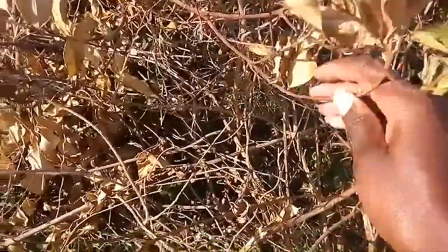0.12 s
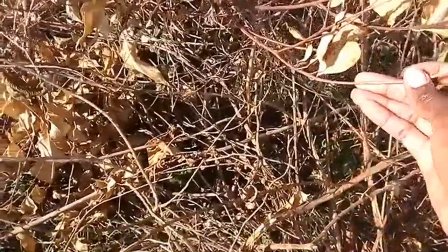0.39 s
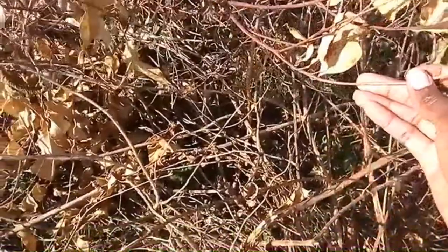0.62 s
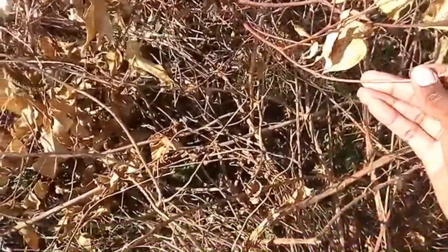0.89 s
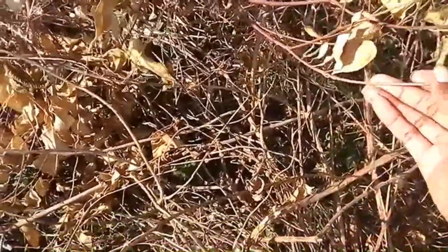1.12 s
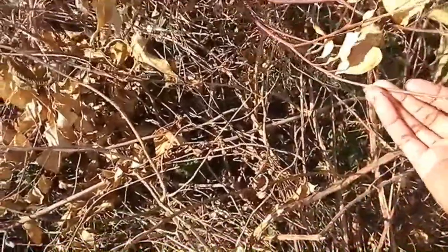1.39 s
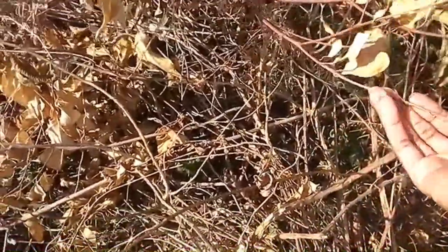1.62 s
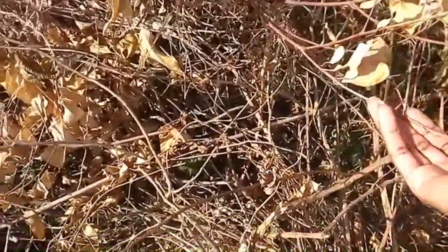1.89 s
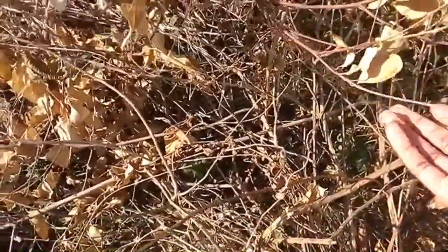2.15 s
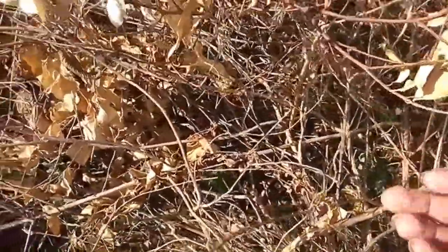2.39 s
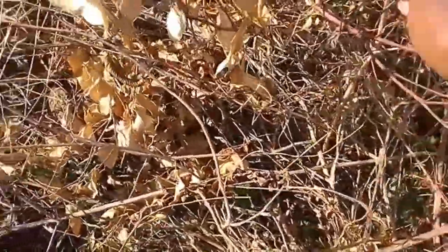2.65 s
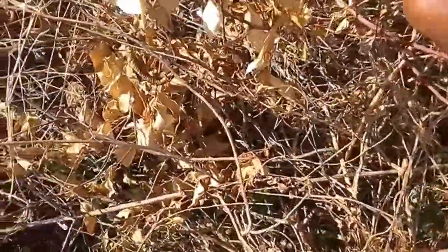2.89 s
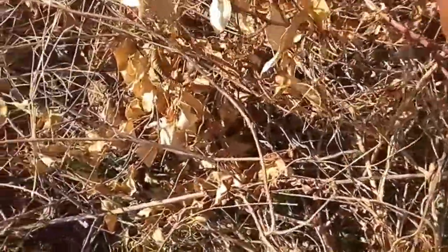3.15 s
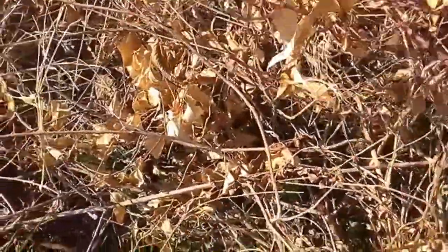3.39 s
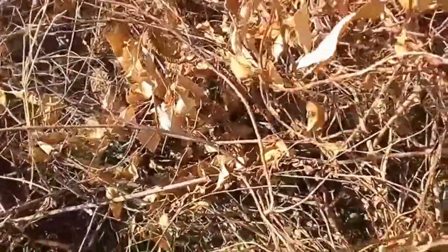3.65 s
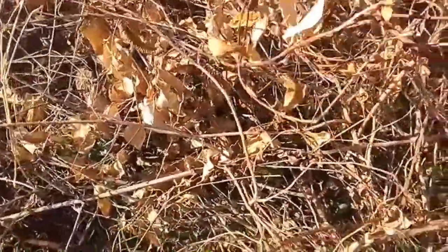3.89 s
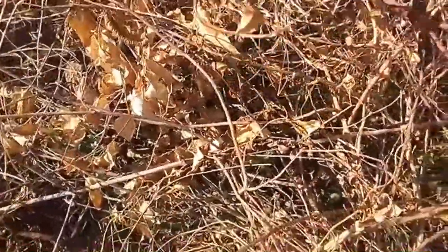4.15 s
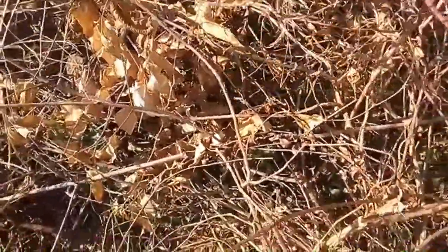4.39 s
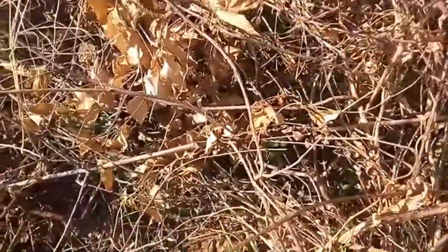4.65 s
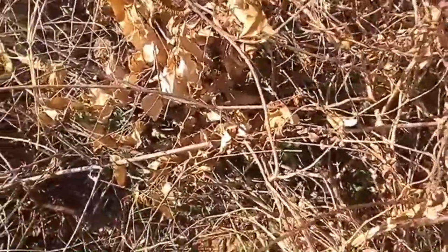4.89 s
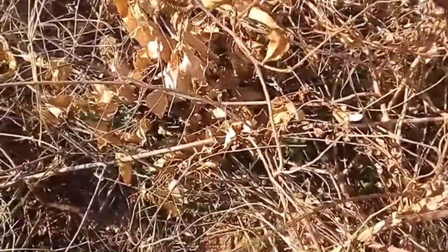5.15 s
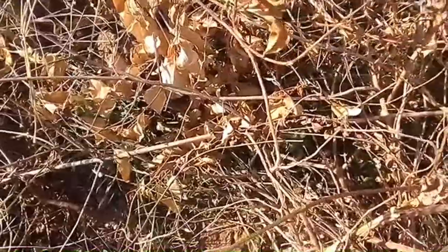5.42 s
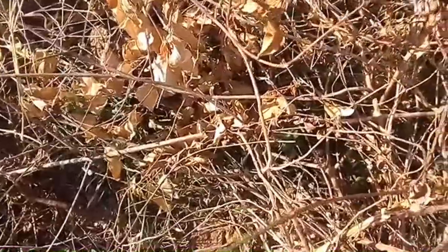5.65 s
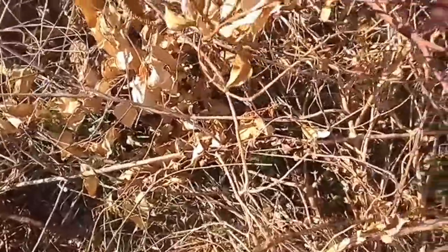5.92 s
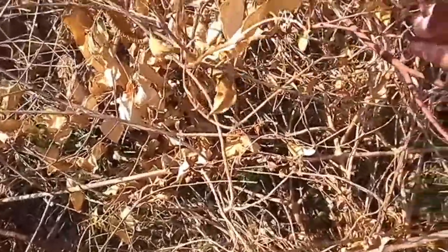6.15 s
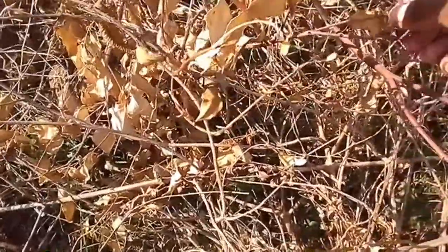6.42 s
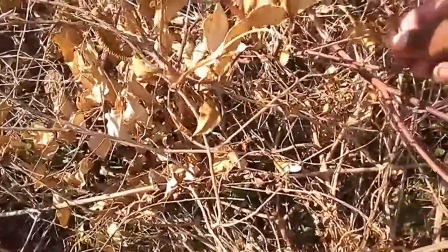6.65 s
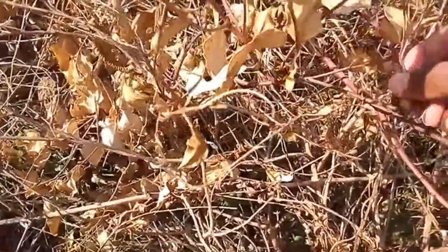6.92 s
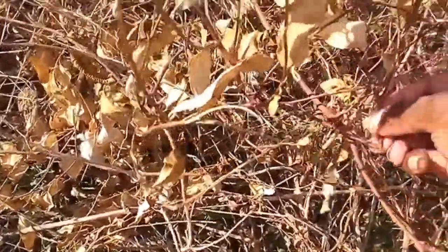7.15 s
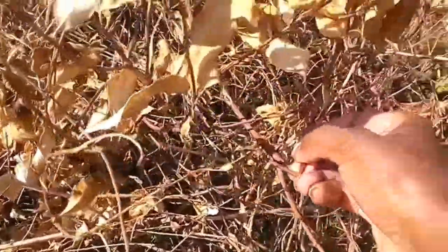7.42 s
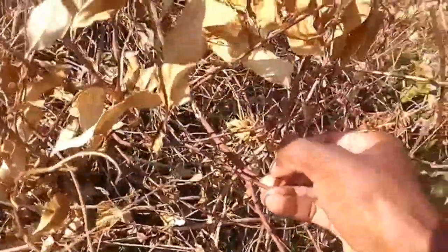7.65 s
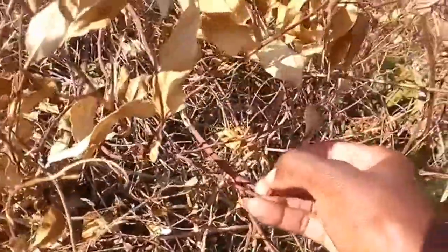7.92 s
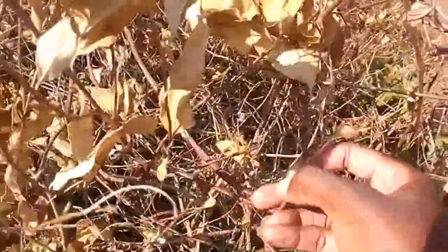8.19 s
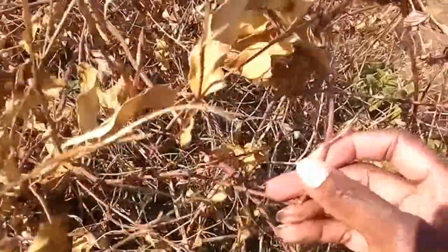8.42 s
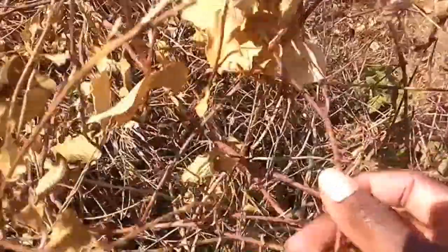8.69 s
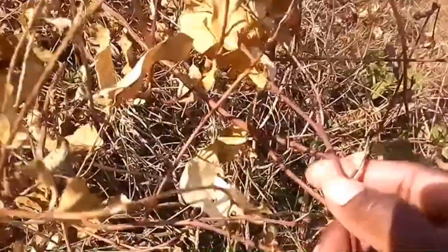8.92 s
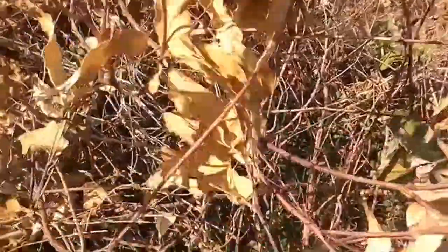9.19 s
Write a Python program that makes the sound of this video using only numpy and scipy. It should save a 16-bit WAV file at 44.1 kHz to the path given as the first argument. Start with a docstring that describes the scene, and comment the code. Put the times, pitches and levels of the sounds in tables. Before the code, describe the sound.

A hand pushes through dead brush outdoors, dry leaves rustling and brittle twigs snapping in uneven bursts, growing loudest and densest at the end.

```python
"""In dead brush, close to a small microphone, a hand pushes through dry leaves and stems.
Leaves rustle in uneven spells of filtered noise, crackle and short rings; twigs snap as noisy, jerky
cracks and leaf edges split in bright noise bursts, all coloured by a microphone port strongest near 6 kHz.
Stems knock as sagging sines and the hand-held housing gives soft low bumps. Behind it lie unsteady
air noise and one faint tone. Both channels carry the same sound."""
import sys
import numpy as np
from scipy import signal
from scipy.fft import rfft, irfft, next_fast_len
from scipy.io import wavfile
from scipy.ndimage import uniform_filter1d, map_coordinates

SR = 44100
rng = np.random.default_rng(int(sys.argv[2]) if len(sys.argv) > 2 else 0)


def int16_out(signal):
    """Quantize to a 16-bit WAV file."""
    q = np.round(np.clip(np.atleast_2d(signal).T, -1, 1) * 32767)
    wavfile.write(sys.argv[1], SR, q.astype(np.int16))


def decibels_to_gain(level_db):
    """Convert a level in decibels to a linear amplitude gain (20 dB per decade)."""
    exponent = np.asarray(level_db, float) / 20
    return 10 ** exponent


N = 410130  # length in samples

# Quiet outdoor air. Each row: frequency in Hz, relative gain in dB.
AIR_COLOUR = [(30, -24), (50, -5.5), (80, -4.5), (200, -11), (440, -12.5), (900, -16), (2200, -17),
              (3100, -18), (4200, -17.5), (5900, -6), (6800, -36.5), (8100, -33.5), (13000, -35.5),
              (15000, -26)]
# The hand resting in the brush. Each row: time in seconds, rustle level in dB, stem share in dB,
# crispness in dB.
RESTING_HAND = [(0, -64, 2.5, -11.5), (0.44, -47, 0.5, -3.5), (0.72, -66, -2.5, -42), (0.94, -70, 13, -23),
                (1.11, -62, -15, -5), (1.33, -58.5, 11.5, -11), (1.53, -58.5, -1, 1), (1.81, -48.5, 4, -7),
                (1.97, -54.5, 4, -6.5), (2.51, -62, 3, -6.5), (2.81, -72, -5.5, -2.5),
                (3.04, -77, -1, -11.5), (3.5, -42, 2, -4.5), (3.94, -49, 4.5, -1), (4.4, -42, 4, -2.5),
                (4.9, -49, 3.5, -3.5), (5.4, -75, 1, -9.5), (5.9, -80, -0.5, -8), (6.1, -54.5, 3, -8),
                (6.47, -63, 0.5, -3), (6.86, -55, 5, -1.5), (7.79, -61, 4.5, -10.5),
                (8.16, -56.5, 5.5, -8.5), (8.41, -36, 3, -1.5), (9.06, -43, 4.5, -5.5), (9.3, -25, 3, -4.5)]
# Strokes of the hand. Each row: time of full strength in seconds, rustle level in dB, swell in seconds,
# hold in seconds, release in seconds.
HAND_STROKES = [(0, -36.5, 0.086, 0.015, 0.27), (0.218, -39, 0.068, 0.11, 0.23),
                (0.623, -50.5, 0.084, 0, 0.18), (1.225, -32, 0.041, 0, 0.088),
                (1.631, -33.5, 0.042, 0, 0.053), (1.71, -26.5, 0.018, 0.021, 0.061),
                (2.099, -39.5, 0.093, 0, 0.14), (2.191, -39, 0.016, 0.15, 0.14),
                (3.082, -51.5, 0.078, 0, .2), (3.199, -37, 0.03, 0.12, 0.26), (3.398, -33, 0.23, 0.05, 0.2),
                (3.512, -31, 0.05, 0.25, 0.12), (4.035, -36.5, 0.089, 0.023, 0.043),
                (4.19, -45, 0.043, 0.034, 0.18), (4.271, -26.5, 0.06, 0.0056, 0.078),
                (4.574, -29.5, 0.075, 0, 0.11), (4.78, -38.5, 0.084, 0, 0.055),
                (5.133, -34, 0.2, 0.041, 0.28), (5.38, -42, 0.02, 0.085, 0.43),
                (5.75, -54.5, 0.026, 0.03, 0.23), (5.947, -38, 0.02, 0.036, 0.12),
                (6.214, -45, 0.062, 0, 0.12), (6.583, -43.5, 0.012, 0.06, 0.31),
                (6.756, -36.5, 0.1, 0.019, 0.099), (7.089, -37.5, 0.48, 0, 0.059),
                (7.317, -33.5, 0.061, 0, 0.05), (7.628, -43.5, 1, 0.022, 0.32),
                (7.832, -34, 0.037, 0.022, 0.13), (7.907, -26, 0.044, 0.023, 0.039),
                (8.051, -28, 0.081, 0.028, 0.074), (8.202, -32.5, 0.048, 0.057, 0.45),
                (8.528, -18, 0.019, 0, 0.02), (8.516, -26, 0.2, 0.2, 0.095),
                (8.602, -21.5, 0.014, 0.011, 0.03), (8.87, -26.5, 0.057, 0.022, 0.043),
                (9.029, -30.5, 0.18, 0, 0.017), (9.089, -25, 0.012, 0.012, 0.066),
                (9.17, -26, 0.068, 0, 0.19), (9.224, -16, 0.053, 0, 0.095)]
# Leaves as the microphone port colours them. Each row: frequency in Hz, relative gain in dB.
PORT_COLOUR = [(59, -46), (100, -24.5), (219, -21), (424, -21), (768, -16.5), (1420, -14.5), (1760, -11.5),
               (2520, -12.5), (4980, 0.5), (6290, 4), (6700, 0.5), (8280, -17), (13900, -28),
               (14700, -19.5), (16000, -15.5)]
# Twig and leaf fractures. Each row: time of the crack in seconds, nominal level in dB, pitch in Hz,
# time in seconds for the fibres to fall by 60 dB.
TWIG_SNAPS = [(0.0735, -19, 4770, 0.031), (0.2382, -9, 8000, 0.0053), (0.2413, -13.5, 6470, 0.0071),
              (0.4279, -25.5, 5430, 0.042), (0.577, -29, 6200, 0.034), (0.618, -28.5, 5970, 0.053),
              (0.6347, -25, 5850, 0.026), (0.662, -34, 6000, 0.023), (0.7763, -46, 6250, 0.087),
              (0.863, -39.5, 4600, 0.013), (1.0875, -40.5, 5890, 0.018), (1.1448, -36, 6400, 0.044),
              (1.2485, -22.5, 6060, 0.019), (1.3718, -31.5, 5400, 0.034), (1.418, -29.5, 5580, 0.028),
              (1.5692, -15.5, 5630, 0.03), (1.6845, -18, 6140, 0.095), (1.713, -12.5, 5660, 0.017),
              (1.7269, -9.5, 6600, 0.0083), (1.9915, -30, 4640, 0.01), (2.1152, -15.5, 5740, 0.016),
              (2.226, -18.5, 5930, 0.041), (2.2355, -12, 6220, 0.012), (2.262, -17.5, 5350, 0.085),
              (2.2984, -15, 6700, 0.035), (2.3222, -19, 6640, 0.029), (2.9974, -36.5, 6000, 0.019),
              (3.16, -30, 5870, 0.033), (3.187, -25, 6640, 0.035), (3.264, -22, 6560, 0.015),
              (3.2778, -13, 6680, 0.0094), (3.3118, -13.5, 6550, 0.022), (3.3523, -13, 6800, 0.02),
              (3.3596, -15.5, 6000, 0.059), (3.379, -15.5, 6370, 0.013), (3.4132, -16.5, 6200, 0.037),
              (3.492, -10, 4300, 0.036), (3.5569, -6.5, 5490, 0.035), (3.69, -17, 4240, 0.02),
              (4.048, -24, 5900, 0.025), (4.155, -23, 6030, 0.015), (4.1755, -10.5, 5600, 0.013),
              (4.184, -19, 6600, 0.043), (4.2193, -20, 6050, 0.021), (4.233, -8.5, 5990, 0.023),
              (4.2604, -17.5, 6700, 0.03), (4.5539, -16, 6500, 0.055), (4.575, -15, 4970, 0.026),
              (4.764, -26, 6200, 0.02), (5.0645, -22, 5270, 0.028), (5.3097, -23, 4940, 0.029),
              (5.4948, -24.5, 5940, 0.013), (5.743, -34.5, 5600, 0.063), (5.812, -33, 6000, 0.037),
              (5.891, -38.5, 4700, 0.02), (5.9284, -30, 5970, 0.045), (6.2045, -26.5, 5770, 0.025),
              (6.536, -40, 5500, 0.064), (6.5959, -23, 6600, 0.031), (6.639, -23, 6400, 0.015),
              (6.7499, -12.5, 4500, 0.017), (7.0833, -15, 4800, 0.031), (7.1943, -26, 4280, 0.024),
              (7.487, -23, 5750, 0.062), (7.6026, -25, 5500, 0.078), (7.7509, -25, 4930, 0.03),
              (7.852, -17, 5300, 0.028), (7.904, -8.5, 5140, 0.03), (7.9873, -10, 5800, 0.034),
              (8.0285, -15, 5340, 0.064), (8.0512, -11.5, 5520, 0.033), (8.0641, -10, 6300, 0.02),
              (8.2044, -18, 5100, 0.04), (8.237, -11.5, 6900, 0.041), (8.2823, -12, 5100, 0.035),
              (8.306, -9, 5270, 0.038), (8.3137, -9.5, 4880, 0.013), (8.3533, -16.5, 5200, 0.038),
              (8.3827, -15, 6450, 0.034), (8.5482, -4, 5860, 0.006), (8.634, -13.5, 5540, 0.033),
              (8.7172, -23, 5830, 0.037), (8.911, -16.5, 5200, 0.055), (9.015, -17.5, 5300, 0.013),
              (9.0305, -19.5, 6100, 0.012), (9.0857, -11, 5670, 0.017), (9.0944, -8, 4800, 0.014),
              (9.1546, -9, 6670, 0.03), (9.166, -6.5, 5500, 0.044), (9.1773, -5.5, 4630, 0.02),
              (9.203, -14, 6600, 0.12), (9.2597, -13.5, 5460, 0.024)]
# Bumps on the housing. Each row: start in seconds, nominal level in dB, pitch in Hz.
HOUSING_BUMPS = [(0.188, -50.5, 56.1), (0.289, -48, 54.3), (8.921, -38.5, 77.5), (9.155, -46, 122),
                 (9.21, -39.5, 45.2), (9.25, -43, 100)]
# Stems knocking together. Each row: start in seconds, nominal level in dB, pitch at the strike in Hz.
STEM_KNOCKS = [(0.23, -36.5, 520), (1.389, -43, 292), (1.908, -34, 563), (2.158, -38, 570),
               (2.304, -40.5, 254), (3.203, -24.5, 1580), (5.718, -54, 400), (6.911, -58, 261),
               (6.971, -52, 330), (7.006, -46.5, 244), (7.041, -58, 206), (7.1, -57, 260),
               (7.163, -49, 252), (7.183, -59, 210), (7.205, -51.5, 230), (7.235, -49.5, 290),
               (7.296, -47, 332), (7.344, -52, 278), (8.598, -30.5, 610), (9.057, -43.5, 237)]
# A faint far tone. The one row: start in seconds, end in seconds, centre pitch in Hz, centre level in dB.
FAR_TONE = (0.3, 1.5, 2677, -78)
# Thin leaf edges splitting. Each row: start in seconds, nominal level in dB.
EDGE_SPLITS = [(3.203, -37), (4.2936, -29), (7.082, -28), (8.715, -26), (9.204, -28)]

AIR_DB = -66
STEM_HZ, CRISP_HZ = 1880, 7460  # stems speak below the first, thin leaf edges above the second
STROKE_RANGE_DB = 20  # the level change over a swell or a release
CRISPER_PER_DB = 0.11  # leaf edges brighten as a stroke rises over the resting hand
APART_DB = -53  # at this rustle level single crackles stand most apart
SNAP_CRISPER_PER_DB = 0.13  # harder fractures reach higher
CREAK_DB, CREAK_S = -18.5, 0.0018  # the piece creaks just before it breaks
KNOCK_SAG, SAG_S = 0.19, 0.028  # the pitch of a struck stem sags by this share, with this time constant
TOP_HZ = 15700


def unit(x):
    """x at an rms of one."""
    return x / np.sqrt(np.mean(x ** 2) + 1e-20)


def curves(rows):
    """One value per sample for each column after the time."""
    s, *columns = np.transpose(rows)
    return [np.interp(np.arange(N) / SR, s, column) for column in columns]


def wobble(rate):
    """A smooth random curve, rate knots a second."""
    knots = rng.standard_normal(int(N * rate / SR) + 4)
    return map_coordinates(knots, [np.arange(N) * rate / SR])


def place(out, s, sound):
    """Adds a sound to out, starting s seconds in."""
    out[round(s * SR):][:len(sound)] += sound


def coloured(x, points):
    """x through the causal, minimum-phase filter whose gain follows the (Hz, dB) points."""
    m = 2 * next_fast_len(N // 2 + 4096)
    hz, db = np.transpose(points)
    bins_hz = np.fft.rfftfreq(m, 1 / SR)
    gain_db = np.interp(np.log(bins_hz + 1), np.log(hz), db)
    cepstrum = irfft(np.log(decibels_to_gain(gain_db) + 1e-6), m)
    # fold the cepstrum onto positive time
    cepstrum[1:m // 2] *= 2
    cepstrum[m // 2 + 1:] = 0
    return irfft(rfft(x, m) * np.exp(rfft(cepstrum)), m)[:N]


def three_bands(x):
    """x split into stem, leaf and crisp ranges that add up to x."""
    spectrum, hz = rfft(x), np.fft.rfftfreq(len(x), 1 / SR)
    low = 1 / (1 + (hz / STEM_HZ) ** 4)
    high = 1 / (1 + (CRISP_HZ / (hz + 1)) ** 6)
    return irfft(spectrum * [low, 1 - low - high, high], len(x))


def patchy(n, depth_db, size=6):
    """Noise whose narrow bands swell and fade at random; size smooths it over time frames."""
    z = signal.stft(rng.standard_normal(n), nperseg=256)[2]
    field = uniform_filter1d(rng.standard_normal(z.shape), size=2, axis=0)
    field = uniform_filter1d(field, size=size, axis=1)
    noise = signal.istft(z * decibels_to_gain(depth_db * unit(field)), nperseg=256)[1]
    return unit(noise[:n])


def air():
    """Far hiss and rumble: coloured noise, gently unsteady in level."""
    noise = coloured(patchy(N, depth_db=2.5, size=40), AIR_COLOUR)
    return decibels_to_gain(AIR_DB + 1.2 * wobble(3.8)) * unit(noise)


def push():
    """Rustle level, stem share and crispness in dB: strokes swell, hold and release over the resting hand."""
    rest_db, stem_db, crisp_db = curves(RESTING_HAND)
    t = np.arange(N) / SR
    power = decibels_to_gain(2 * rest_db)
    for s, db, swell, hold, release in HAND_STROKES:
        # zero during the hold, one a full swell before it or a full release after it
        away = np.maximum((s - t) / swell, (t - s - hold) / release)
        power = power + decibels_to_gain(2 * (db - STROKE_RANGE_DB * np.maximum(away, 0)))
    level_db = 10 * np.log10(power)
    return level_db, stem_db, crisp_db + CRISPER_PER_DB * (level_db - rest_db)


def fade(x, t60):
    """Every impulse of x dies away exponentially, by 60 dB in t60 seconds."""
    return signal.lfilter([1], [1, -decibels_to_gain(-60 / (t60 * SR))], x)


def crackle(count, spread_db, colour_db, t60):
    """Envelopes of random fractures in the three ranges; a few are larger, each has its own colour."""
    draw = rng.random((count, 2))
    at = (draw[:, 0] * N).astype(int)
    size_db = np.minimum(-spread_db * np.log(1 - draw[:, 1]), 9)
    sizes = decibels_to_gain(size_db[:, None] + colour_db * rng.standard_normal((count, 3)))
    impulses = np.array([np.bincount(at, s, N) for s in sizes.T])
    return fade(fade(impulses, t60), t60 / 5)  # each swells, then dies


def rings(count, low_hz, high_hz, cycles, spread_db):
    """Curled leaves and thin stems ring for a few cycles when flicked."""
    draw, k = rng.random((count, 3)), np.arange(1400)
    hz = low_hz * (high_hz / low_hz) ** draw[:, 1:2]
    size = decibels_to_gain(np.minimum(-spread_db * np.log(1 - draw[:, 2:]), 14))
    life = k * hz / SR / cycles
    at = (draw[:, :1] * N).astype(int) + k
    sound = size * life * np.exp(-life) * np.sin(2 * np.pi * hz * k / SR)
    return unit(np.bincount(at.ravel(), sound.ravel(), N + len(k))[:N])


def rustle(level_db, stem_db, crisp_db):
    """Leaves rub in clumps: a sliding hiss, fine crackle and short rings of leaves and stems."""
    crisp_db = np.minimum(crisp_db, 5)  # a ceiling on the leaf edges
    fine = unit(crackle(count=12000, spread_db=4.5, colour_db=5, t60=0.007))
    ticks = unit(crackle(count=4000, spread_db=8, colour_db=6, t60=0.0012))
    # little breaks at rest; hard strokes merge the crackle
    busy = 0.71 + np.exp(-((level_db - APART_DB) / 16) ** 2)
    slide = decibels_to_gain(1.8 * np.array([wobble(45), wobble(45), wobble(45)]))
    envelopes = unit(0.7 * slide + busy * (0.7 * fine + 0.31 * ticks))
    rubbing = envelopes * three_bands(patchy(N, depth_db=2.5, size=7))
    shares = decibels_to_gain(np.array([stem_db, 0 * stem_db, crisp_db]))
    leaves = 0.22 * rings(count=5000, low_hz=2210, high_hz=9190, cycles=5, spread_db=3.5)
    stems = 0.08 * decibels_to_gain(stem_db) * rings(count=700, low_hz=300.6, high_hz=2517, cycles=7, spread_db=1)
    return decibels_to_gain(level_db) * ((shares * rubbing).sum(0) + leaves + stems)


def snaps(crisp_db):
    """A piece creaks, cracks in two modes, then its fibres let go in jerks, coloured by its resonances."""
    out, t = np.zeros(N + SR), np.arange(SR // 8) / SR
    lead = SR // 50  # samples of creak ahead of the crack
    lower_ratios = 0.598 + 0.218 * rng.random(len(TWIG_SNAPS))
    for (s, db, hz, t60), lower in zip(TWIG_SNAPS, lower_ratios):
        heft = decibels_to_gain(0.22 * db)  # thicker pieces break louder and with more body
        modes = 1.12 * np.sin(2 * np.pi * hz * t) + heft * np.sin(2 * np.pi * lower * hz * t)
        jerks = decibels_to_gain(3.43 * map_coordinates(rng.standard_normal(100), [t * 700]))
        low, leaf, crisp = three_bands(patchy(len(t), depth_db=1.5))
        edge = decibels_to_gain(crisp_db[round(s * SR)] + 3.5 + SNAP_CRISPER_PER_DB * db)
        piece = (1.3 * heft * low + leaf + edge * crisp) / np.std(leaf[:SR // 200])
        crack_shape = decibels_to_gain(-60 * t / min(0.007, t60)) * (1 - np.exp(-t / 0.00096))
        crack = crack_shape * (modes + 0.3 * piece)
        fibres = decibels_to_gain(-60 * t / t60) * (1 - np.exp(-t / 0.0054)) * jerks * piece
        creak = decibels_to_gain(CREAK_DB) * np.exp(-t[lead:0:-1] / CREAK_S) * piece[-lead:]
        place(out, s - lead / SR, decibels_to_gain(db - 3.5) * np.append(creak, crack + 0.51 * fibres))
    return out[:N]


def bumps():
    """The housing gives one or two soft low swings: a sine that swells and dies within milliseconds."""
    out, t = np.zeros(N + SR), np.arange(SR // 8) / SR
    rise = t / 0.0058
    for s, db, hz in HOUSING_BUMPS:
        place(out, s, decibels_to_gain(db + 8) * rise * np.exp(-rise) * np.sin(2 * np.pi * hz * t))
    return out[:N]


def knocks():
    """Thick stems ring in one low mode and a weaker overtone; thin ones die sooner."""
    out, t = np.zeros(N + SR), np.arange(SR // 4) / SR
    for s, db, hz in STEM_KNOCKS:
        turns = np.cumsum(hz * (1 - KNOCK_SAG * (1 - np.exp(-t / SAG_S)))) / SR
        decay_db = 60 * t * hz / 18  # 60 dB in 18 cycles of the struck pitch
        mode = (1 - np.exp(-t / 0.0008)) * np.sin(2 * np.pi * turns)
        overtone = 0.51 * decibels_to_gain(-60 * t / 0.0089) * np.sin(2 * np.pi * 2.6 * hz * t)
        # the branch below: an octave down, dying half as fast
        branch = 0.23 * (1 - np.exp(-t / 0.003)) * decibels_to_gain(decay_db / 2) * np.sin(np.pi * turns)
        contact = 0.22 * decibels_to_gain(-60 * t / 0.009) * rng.standard_normal(len(t))
        place(out, s, decibels_to_gain(db - 3.5 - decay_db) * (mode + overtone + branch + contact))
    return out[:N]


def thin_tone():
    """One soft swell of a sine, unsteady in pitch and level."""
    start, end, hz, db = FAR_TONE
    progress = np.clip((np.arange(N) / SR - start) / (end - start), 0, 1)
    swell = np.sin(np.pi * progress) ** 0.5
    turns = np.cumsum(hz + 30 * wobble(25)) / SR
    return decibels_to_gain(db + 3 * wobble(30)) * swell * np.sin(2 * np.pi * turns)


def splits():
    """A leaf edge gives a short burst of noise in the crisp range alone."""
    out, t = np.zeros(N + SR), np.arange(SR // 20) / SR
    for s, db in EDGE_SPLITS:
        crisp = unit(three_bands(rng.standard_normal(len(t)))[2])
        place(out, s, decibels_to_gain(db + 11 - 60 * t / 0.018) * crisp)
    return out[:N]


def scene():
    """Rustle, snaps and splits pass the port; the other layers join after it, alike in both channels."""
    port_gain = np.std(coloured(rng.standard_normal(N), PORT_COLOUR))
    level_db, stem_db, crisp_db = push()
    leaves_and_twigs = rustle(level_db, stem_db, crisp_db) + snaps(crisp_db) + splits()
    brush = coloured(leaves_and_twigs, PORT_COLOUR) / port_gain
    return np.tile(brush + air() + bumps() + knocks() + thin_tone(), (2, 1))


def band_limit(x):
    """A steep low-pass at the top of the band."""
    return signal.sosfilt(signal.butter(12, 16810, fs=SR, output="sos"), x)


def record(dry):
    """A steep band limit takes off the extreme treble."""
    below_top = np.fft.rfftfreq(N, 1 / SR) < TOP_HZ
    mix = irfft(rfft(dry) * below_top, N)
    return band_limit(mix)


dry = scene()
out = record(dry)
int16_out(out)
```